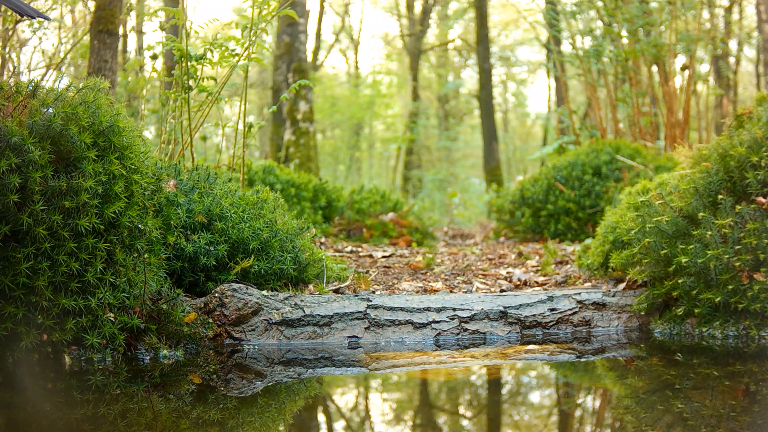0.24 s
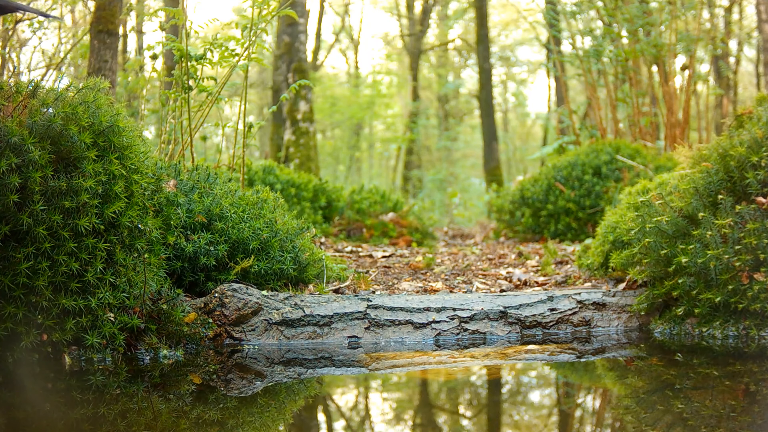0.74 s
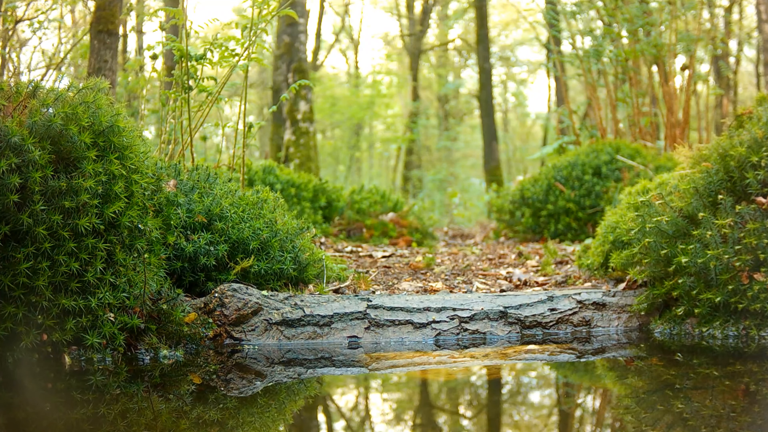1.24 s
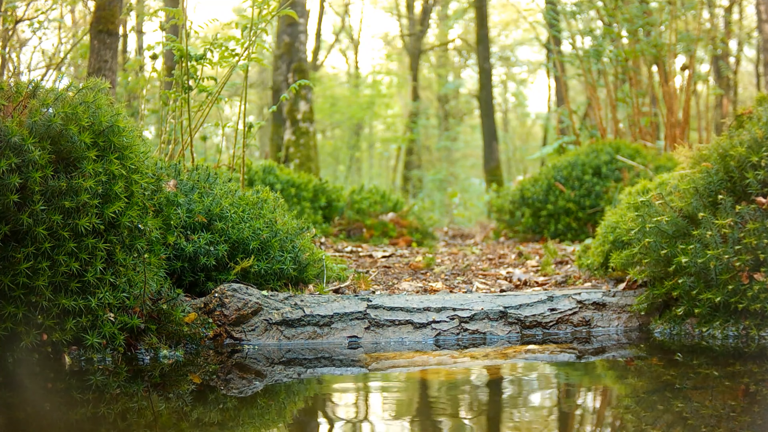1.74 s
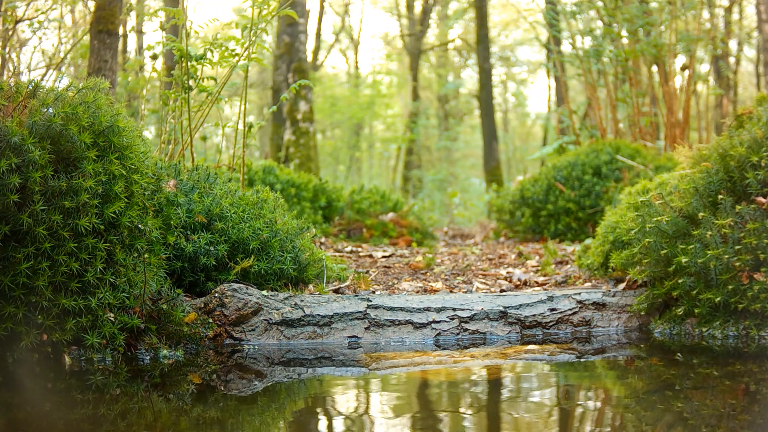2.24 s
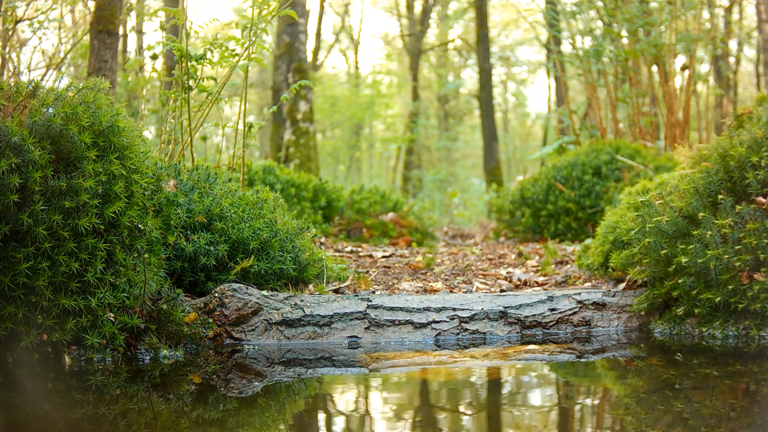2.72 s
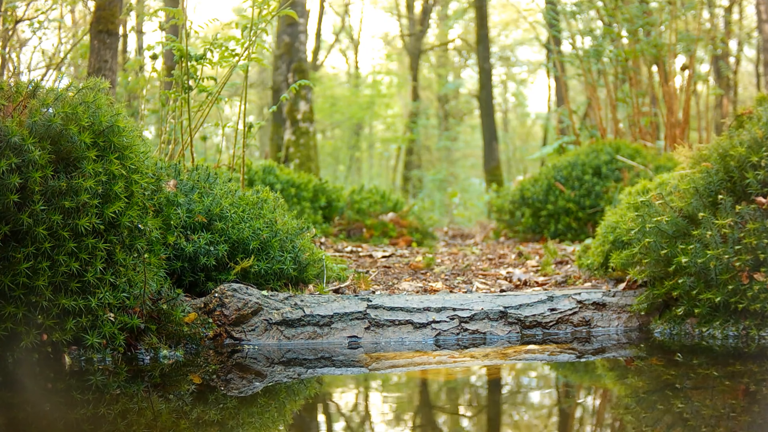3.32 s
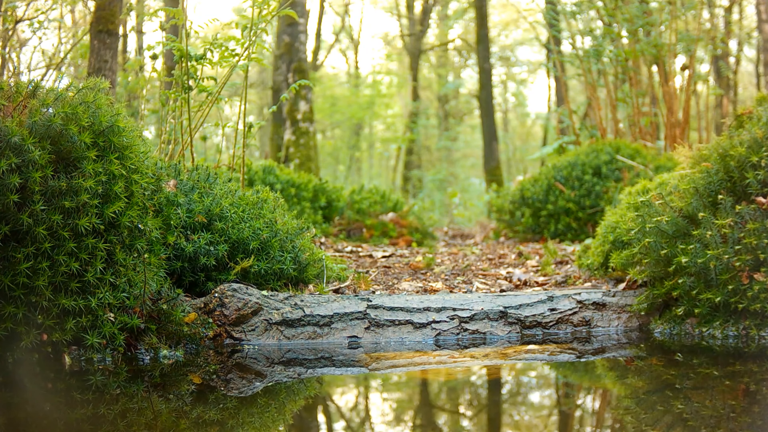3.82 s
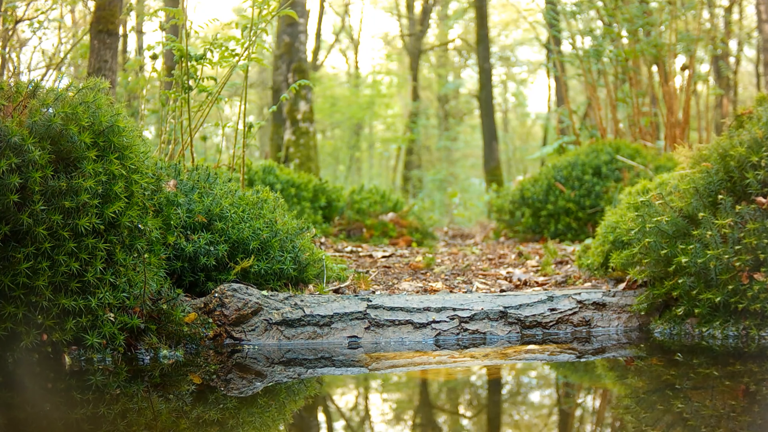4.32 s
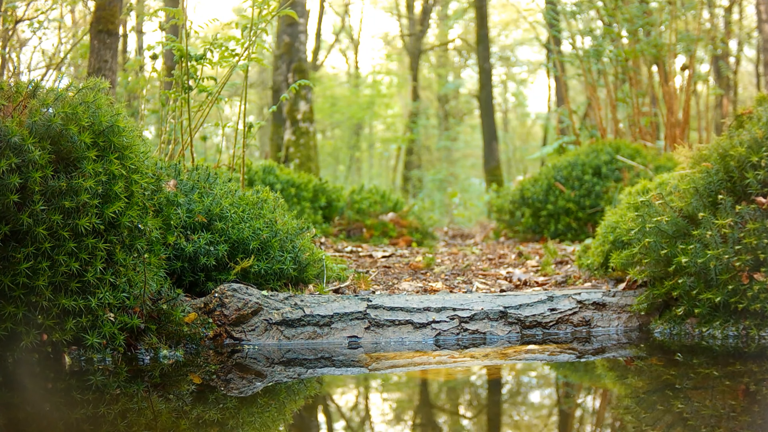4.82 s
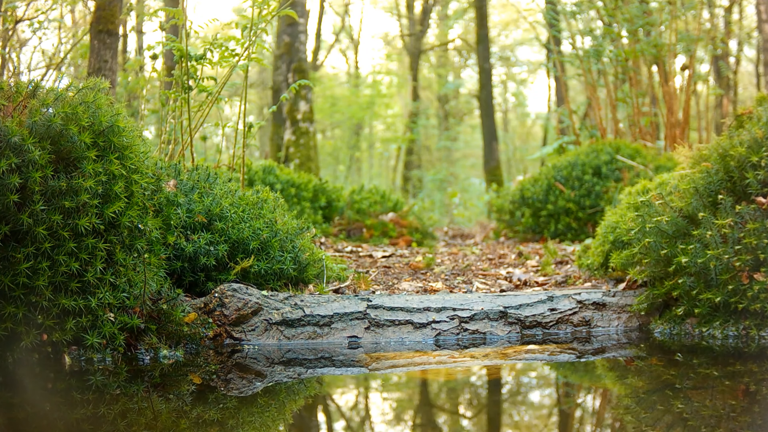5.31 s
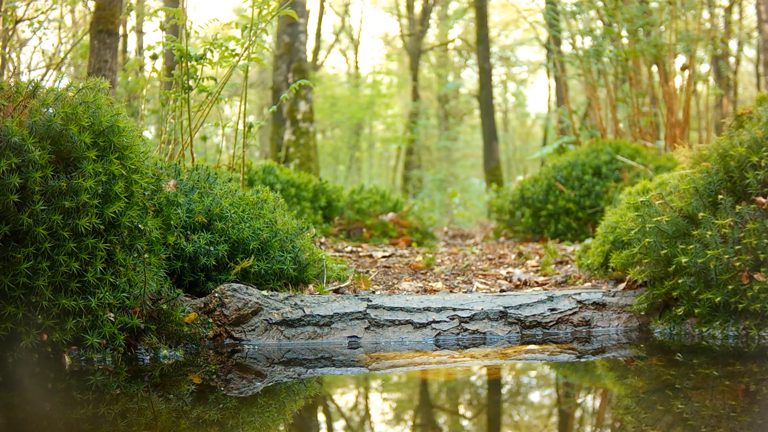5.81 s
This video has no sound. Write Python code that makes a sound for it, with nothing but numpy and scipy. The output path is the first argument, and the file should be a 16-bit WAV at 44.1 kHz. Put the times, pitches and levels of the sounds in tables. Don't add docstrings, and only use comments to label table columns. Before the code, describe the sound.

Faint, busy bird twitter in a leafy glade, a brief soft wing flutter, then one loud fluty blackbird phrase before the twitter resumes.

```python
import sys
import numpy as np
from scipy import signal
from scipy.fft import rfft, irfft, next_fast_len
from scipy.io import wavfile
from scipy.ndimage import uniform_filter1d

SR = 44100
rng = np.random.default_rng(int(sys.argv[2]) if len(sys.argv) > 2 else 0)


def how_loud(loudness_db):
    steps = np.asarray(loudness_db, float) / 20
    return 10 ** steps


def store_pcm(level_fs):
    pcm = np.round(np.clip(level_fs, -1, 1) * 32767).astype(np.int16)
    wavfile.write(sys.argv[1], SR, np.atleast_2d(pcm).T)


N = 267143


def evened(x):
    return x / np.sqrt(np.mean(x ** 2) + 1e-20)


def read(points, hz):
    f, value = np.transpose(points)
    return np.interp(np.log(hz + 1), np.log(f + 1), value)


def add(mix, s, sound):
    part = mix[round(s * SR):][:len(sound)]
    part += sound[:len(part)]


def drift(span, channels):
    wander = uniform_filter1d(rng.standard_normal((channels, N)), span)
    return evened(uniform_filter1d(wander, span))


def sung(rows, kind):
    bend, top, swell_db, fade_db = kind
    u = np.arange(17) / 16
    loss_db = np.interp(u, [0, np.clip(top, .02, .98), 1], [swell_db, 0, fade_db])
    notes = []
    for s, long, from_hz, to_hz, db in rows:
        pitch = from_hz + (to_hz - from_hz) * u ** bend
        notes.append(np.transpose([s + u * long, pitch, db - loss_db]))
    return notes


def whistle(rows, shake, edge, octave_db=-52):
    s, hz, level_db = np.transpose(rows)
    t = np.arange(s[0], s[-1], 1 / SR)
    per_s, swing_hz, dip, top, gap = shake
    wave = np.cos(2 * np.pi * per_s * (t - top))
    pitch = uniform_filter1d(np.interp(t, s, hz), 200, mode="nearest") + swing_hz * wave
    phase = 2 * np.pi * np.cumsum(pitch) / SR
    shut = 1 - np.clip(dip, 0, 1) * np.cos(np.pi * (per_s * (t - top) - gap)) ** 6
    to_end = np.minimum(t - s[0], s[-1] - t)
    ends = np.sin(np.pi / 2 * np.clip(to_end / edge, 0, 1)) ** 2
    tone = np.sin(phase) + how_loud(octave_db) * np.sin(2 * phase)
    return s[0], np.sqrt(2) * how_loud(np.interp(t, s, level_db)) * shut * ends * tone


def wood(x, near_db, far_db, near_t60):
    # frequency in Hz, decay time t60 in s.
    decay = [(1500, 1), (3000, 1.47), (5000, 0.85), (8000, 0.09)]
    # delay in s, level in dB.
    echoes = [(.00403, -10), (.00961, -11)]
    glade_s, glade_edge_s = .185, .025
    stir_rad = 2.2
    age = np.arange(SR) / SR
    taps = np.zeros((2, SR))
    at = np.arange(300, SR - 20, 20) + rng.integers(0, 20, (2, (SR - 301) // 20))
    np.put_along_axis(taps, at, rng.choice([-1., 1.], at.shape), 1)

    near = (taps * how_loud(-60 * age / near_t60))[:, :SR // 2]
    near /= 1 + np.exp((age[:SR // 2] - glade_s) / glade_edge_s * 2)
    near *= how_loud(near_db) / np.linalg.norm(near[0])
    for delay, db in echoes:
        arrival = np.round(delay * SR * np.array([1, 1.09])).astype(int)
        near[[0, 1], arrival] += how_loud(db)

    hz, t, z = signal.stft(taps, SR, nperseg=256)
    z *= how_loud(-60 * t / read(decay, hz)[:, None])
    far = signal.istft(z, SR, nperseg=256)[1][:, :SR]
    far /= np.linalg.norm(far[0])

    near = signal.fftconvolve(x[None], near, axes=1)[:, :N]
    far = signal.fftconvolve(x[None], far, axes=1)[:, :N]
    stir = stir_rad * drift(1500, channels=1)[0]
    far = np.cos(stir) * far + np.sin(stir) * far[::-1] * [[1], [-1]]
    return near + how_loud(far_db) * far


def bird(notes, shakes, edge, pan_db, lead_ms, flutter_db, near_db, far_db, near_t60):
    voice, size = np.zeros(N), next_fast_len(N)
    steady = (0.88, 0.0022, 0.0032, 0.0018, .5)
    for rows, shake in zip(notes, shakes + [steady] * len(notes)):
        add(voice, *whistle(rows, shake, edge))
    side = np.array([[.5], [-.5]])
    hz = np.fft.rfftfreq(size, 1 / SR)
    lead = np.exp(2j * np.pi * hz * side * lead_ms / 1000)
    unsteady = voice * how_loud(flutter_db * drift(500, channels=1))
    straight = irfft(rfft(unsteady, size) * lead, size)[:, :N] * how_loud(pan_db * side)
    return straight + wood(voice, near_db, far_db, near_t60)


def air():
    # frequency in Hz, level in dB.
    spectrum = [(30, -76), (100, -77), (300, -83), (1000, -89), (2000, -89.5), (3300, -85), (5000, -93),
                (6500, -99.5), (10600, -100), (11100, -119), (16000, -121)]
    # frequency in Hz, left-right likeness 0-1.
    likeness = [(25, 0.21), (100, 0.079), (300, 0.062), (700, 0.13), (9000, 0.044), (12000, 0.23)]
    patchy_db = 1.2
    frames, hz = N // 512 + 5, np.fft.rfftfreq(2048, 1 / SR)
    a, b, c, d, patches = rng.standard_normal((frames, 1025, 5)).T
    patches = evened(uniform_filter1d(uniform_filter1d(patches, 20, 0), 8, 1))
    same = np.clip(read(likeness, hz), -1, 1)[:, None]
    left = a + 1j * b
    right = same * left + np.sqrt(1 - same ** 2) * (c + 1j * d)
    z = np.array([left, right]) * how_loud(read(spectrum, hz)[:, None] + patchy_db * patches)
    return signal.istft(z, nperseg=2048, noverlap=1536)[1][:, :N]


def drone():
    # frequency in Hz, width in Hz, level in dB.
    tones = [(56, 14, -72.5), (77.5, 10, -81)]
    # time in s, level in dB.
    swell = [(0.0, -66), (1.789, -82), (4.619, -65.5), (6.05, -74)]
    s, db = np.transpose(swell)
    size = next_fast_len(N)
    f, out = np.fft.rfftfreq(size, 1 / SR), np.zeros((2, N))
    for hz, width, level_db in tones:
        noise = rng.standard_normal(size) + .7 * rng.standard_normal((2, size))
        band = np.exp(-((f - hz) / width) ** 2 * 2)
        out += how_loud(level_db) * evened(irfft(rfft(noise) * band, size)[:, :N])
    course = how_loud(np.interp(np.arange(N) / SR, s, db - db.mean()))
    return out * course * how_loud([[1.5], [-1.5]])


def warbler():
    # start in s, length in s, from Hz, to Hz, level in dB.
    buzzes = [(0, 0.1, 3490, 3770, -56), (.88, 0.073, 2843, 2877, -57.5), (1.31, 0.064, 3860, 3290, -48),
              (1.73, 0.063, 4225, 3960, -48.5), (3.34, 0.052, 4657, 4733, -60.5),
              (4.02, 0.043, 3160, 3212, -48), (3.45, 0.078, 4150, 4015, -52.5),
              (3.635, 0.046, 4020, 3960, -53.5), (3.825, 0.05, 4080, 4000, -54),
              (4.025, 0.08, 5140, 4946, -58), (4.615, 0.071, 6630, 8000, -62),
              (4.635, 0.046, 8200, 9370, -67), (4.655, .02, 4300, 5200, -46), (2.34, .03, 4700, 6040, -62),
              (2.545, .03, 4375, 5620, -57), (4.64, 0.075, 5440, 6300, -61.5),
              (4.7, 0.091, 4250, 4830, -55.5), (4.648, 0.027, 3950, 4810, -38.5),
              (4.9, 0.0307, 4800, 6870, -50), (5.14, 0.096, 2144, 2303, -52), (5.3, 0.049, 3192, 3150, -44),
              (5.58, 0.042, 3317, 3590, -48), (5.62, 0.013, 3470, 5630, -51.5),
              (5.72, 0.046, 5320, 5660, -67), (3.23, .08, 5100, 5500, -73), (3.36, .07, 4250, 4150, -64),
              (3.31, .1, 3600, 3450, -62), (3.51, .07, 5400, 5600, -71), (3.58, .08, 5100, 5050, -73),
              (3.7, .06, 5400, 5700, -67), (3.71, .05, 3850, 3800, -61), (3.86, .1, 5200, 5500, -68),
              (3.96, .025, 4600, 4550, -62), (4.05, .05, 4750, 4700, -63), (4.16, .05, 4700, 4800, -64),
              (4.23, .07, 4100, 4000, -66), (4.68, .1, 3700, 3900, -52), (4.72, .07, 5000, 5200, -61),
              (4.84, .12, 2850, 2700, -52), (4.66, .1, 7500, 7600, -68)]
    sweeps = [(.02, 0.018, 4270, 5070, -47), (.18, 0.053, 4090, 5050, -49.5), (.725, 0.04, 4440, 5200, -55),
              (.905, 0.05, 4860, 5790, -66), (1.085, 0.037, 4780, 5830, -62),
              (1.21, 0.036, 5020, 5115, -56), (1.42, 0.028, 4660, 5170, -54),
              (4.17, 0.036, 4830, 5700, -57), (4.335, .03, 4600, 5680, -58.5)]
    hooks = [(.415, 0.055, 3415, 5190, -50.5), (.585, 0.061, 2936, 5000, -50.5),
             (1.02, 0.052, 2933, 3930, -54), (1.23, 0.06, 2935, 4120, -50), (2.69, 0.061, 2450, 3370, -54),
             (2.82, 0.058, 2440, 3370, -58), (2.96, 0.057, 2443, 3440, -58), (3.09, 0.078, 2520, 3140, -57)]
    falls = [(.06, 0.072, 4530, 3310, -54), (.23, 0.037, 4800, 3880, -49), (.34, 0.064, 3360, 2840, -57.5),
             (.555, 0.031, 3290, 2800, -59), (.745, 0.051, 3130, 2838, -54.5),
             (1.11, 0.042, 3715, 3236, -53), (1.655, .05, 3550, 3050, -50.5),
             (1.835, .065, 3650, 3150, -46.5), (1.915, 0.029, 5000, 3720, -53.5),
             (2.02, 0.06, 3690, 3083, -45.5), (2.1, 0.031, 4770, 3715, -52.5),
             (2.345, 0.025, 4500, 2654, -53), (2.57, 0.052, 3900, 2913, -52.5),
             (3.8, 0.036, 2788, 2557, -51.5), (4.365, 0.096, 5590, 4040, -56.5),
             (4.4, .08, 4900, 4200, -59), (4.93, 0.011, 5100, 4050, -47)]
    curls = [(0, 0.034, 2800, 2960, -62.5), (.17, 0.022, 2900, 2907, -59.5), (.865, 0.037, 4440, 4230, -61),
             (1.445, 0.063, 2950, 3183, -52), (1.495, 0.043, 3720, 3895, -49.5),
             (1.54, 0.043, 4050, 3890, -48), (4.11, .26, 2844, 2766, -51), (2.17, 0.045, 2756, 3060, -58),
             (2.21, 0.058, 3270, 3973, -48), (2.37, 0.069, 3224, 3773, -47),
             (3.475, .04, 2330, 2396, -46.5), (3.7, .025, 2550, 2550, -52.5),
             (3.93, 0.072, 3000, 3100, -51.5), (3.26, 0.053, 3120, 3297, -54),
             (3.742, .05, 2790, 2766, -55), (5.975, 0.036, 3010, 3670, -54.5), (3.45, .08, 4750, 4600, -69),
             (3.59, .05, 2300, 2300, -55), (3.6, .06, 3400, 3300, -66), (3.67, .04, 4550, 4550, -69),
             (3.255, .025, 1620, 1750, -49), (5.04, .05, 1980, 2050, -64), (5.02, .05, 3750, 3700, -62),
             (4.885, .04, 4050, 4000, -61), (5.74, .06, 2100, 2500, -65), (5.76, .08, 3300, 3400, -60),
             (.27, .06, 5050, 5000, -62), (.66, .05, 5150, 5150, -63), (1.04, .05, 4250, 4300, -60),
             (1.33, .04, 4250, 4450, -64), (1.55, .04, 4500, 4300, -65)]
    flicks = [
        (1.737, 0.0046, 4400, 5450, -51),
        (2.322, .016, 4410, 6500, -53),
        (2.53, 0.014, 3900, 6210, -47),
        (5.755, 0.014, 3165, 5200, -47),
    ]
    # glide bend, loudest place 0-1, swell in dB, fade in dB.
    rasp = (1.4, 0.17, 1.3, 3.3)
    sweep = (.9, 1.1, 8, 6.9)
    hook = (2.5, 0.34, 30, 1)
    fall = (.8, .8, 2, 1)
    curl = (.6, 0.24, 4.2, 3.5)
    flick = (1.3, .3, 4, 27)
    # shakes per s, swing in Hz, level dip 0-1, s of one top, dip place in turns.
    buzz = (106.5, 149, 0.37, -0.5, .5)
    notes = sung(buzzes, rasp) + sung(sweeps, sweep) + sung(hooks, hook)
    notes += sung(falls, fall) + sung(curls, curl) + sung(flicks, flick)
    return bird(notes, [buzz] * len(buzzes), edge=0.00078, pan_db=-.7, lead_ms=2.5, flutter_db=0.31,
                near_db=-3, far_db=-6.5, near_t60=0.33)


def tit():
    # start in s, length in s, level in dB.
    low = [(0.552, .15, -48.5), (0.954, 0.059, -47.5), (1.035, 0.056, -42.5), (1.319, 0.022, -49),
           (1.365, .065, -47.5), (1.458, 0.049, -52), (5.063, 0.065, -60.5), (5.126, 0.064, -52),
           (5.212, 0.059, -47.5), (5.494, 0.1336, -47.5), (5.611, 0.03, -54), (5.898, 0.054, -49),
           (5.954, 0.065, -49)]
    high = [(.76, 0.18, -70.5), (1.135, 0.05, -60), (1.226, .045, -61), (1.636, .08, -66),
            (4.585, 0.025, -62.5), (4.8, 0.15, -66), (5.271, .07, -61.5), (5.665, 0.095, -58.5),
            (5.781, 0.071, -72.5)]
    # glide bend, loudest place 0-1, swell in dB, fade in dB.
    steady = (1.1, 0.59, 5.5, 5.1)
    low_hz, high_hz, rise_hz = 3982, 4723, 30
    notes = [(s, long, low_hz, low_hz + rise_hz, db) for s, long, db in low]
    notes += [(s, long, high_hz, high_hz + rise_hz, db) for s, long, db in high]
    return bird(sung(notes, steady), [], edge=0.0034, pan_db=1.3, lead_ms=1.285, flutter_db=2.6,
                near_db=-3.0, far_db=-9, near_t60=0.11)


def wings():
    # time in s, level in dB.
    strokes = [(0.821, -65), (0.886, -64), (0.944, -64), (1.012, -69), (1.084, -70), (1.157, -70),
               (1.23, -72)]
    # frequency in Hz, level in dB.
    spectrum = [(250, -7), (600, 3), (1150, -1), (2500, -10), (9000, -36), (14000, -36)]
    t, out = np.arange(1500) / SR, np.zeros(N)
    colour = how_loud(read(spectrum, np.fft.rfftfreq(1500, 1 / SR)))
    swell = t / 0.0071 * np.exp(1 - t / 0.0066)
    for (s, db), noise in zip(strokes, rng.standard_normal((len(strokes), 1500))):
        puff = evened(irfft(rfft(noise) * colour))
        add(out, s - .006, how_loud(db) * puff * swell)
    return out


def ticks():
    # time in s, relative level in dB.
    snaps = [(.893, -5), (.944, -3), (.972, -8), (1.011, 0), (1.083, 0), (1.156, -1), (1.229, -1)]
    level_db, decay_s, low_edge_hz = -66, .0015, 10500
    t, out = np.arange(400) / SR, np.zeros(N)
    high = signal.butter(4, low_edge_hz, "high", fs=SR, output="sos")
    for (s, db), noise in zip(snaps, rng.standard_normal((len(snaps), 400))):
        add(out, s, how_loud(level_db + db) * signal.sosfilt(high, noise * np.exp(-t / decay_s)))
    return out


def blackbird():
    # time in s, pitch in Hz, level in dB.
    trills = [
        [(3.148, 1794, -37.5), (3.18, 2274, -33), (3.21, 2344, -30), (3.235, 2353, -21)],
        [(3.85, 2600, -46), (3.87, 2560, -29), (3.895, 2537, -29), (3.915, 2370, -25)],
        [(4.272, 2188, -25), (4.3, 2190, -18.5), (4.36, 2167, -14), (4.385, 2180, -11.5), (4.401, 2150, -16)],
        [(4.647, 2007, -34.5), (4.672, 2340, -34.5), (4.7, 3027, -24)],
        [(4.726, 2655, -16.5), (4.745, 2322, -40), (4.765, 2430, -32), (4.779, 2790, -23)],
    ]
    # shakes per s, swing in Hz, level dip 0-1, s of one top, dip place in turns.
    shakes = [
        (79, 300, .85, 3.196, .3),
        (158, 120, .9, 3.873, .5),
        (42.5, 62, 1, 4.338, .52),
        (64, 190, .6, 4.685, .4),
        (45, 330, .2, 4.749, .5),
    ]
    # time in s, pitch in Hz, level in dB.
    flutes = [
        [(3.1, 2080, -54), (3.112, 1900, -48.5), (3.13, 1770, -35.5), (3.149, 1750, -28.5)],
        [(3.277, 2040, -38), (3.287, 2100, -22), (3.3, 2134, -21.5), (3.333, 2085, -16.5), (3.36, 2030, -19),
         (3.385, 1988, -21)],
        [(3.56, 1870, -34), (3.585, 1770, -19.5), (3.61, 1703, -20), (3.66, 1664, -24.5)],
        [(3.912, 2250, -25.5), (3.925, 2130, -20), (3.938, 2040, -17), (3.952, 1900, -30)],
        [(3.99, 2080, -37), (4.04, 2290, -33), (4.07, 2450, -31.5), (4.079, 2474, -12.5), (4.092, 2465, -13),
         (4.104, 2453, -17)],
        [(4.183, 1674, -37), (4.2, 1780, -24), (4.217, 1750, -18.5), (4.237, 1640, -27.5)],
        [(4.397, 2130, -15), (4.407, 2160, -13.5), (4.42, 2223, -17), (4.435, 2270, -17), (4.445, 2272, -28)],
        [(4.6, 3127, -42.5), (4.613, 3300, -33), (4.628, 3550, -36), (4.636, 3700, -23), (4.65, 3750, -31),
         (4.672, 3650, -38)],
        [(4.69, 2900, -27), (4.7, 3010, -21), (4.71, 3070, -21), (4.727, 3006, -15.5)],
        [(4.772, 2950, -30), (4.782, 3160, -23), (4.793, 3232, -13), (4.812, 3228, -11), (4.835, 3200, -28)],
    ]
    # start in s, length in s, from Hz, to Hz, level in dB.
    swells = [(3.511, 0.043, 1742, 1790, -18.5), (3.69, .022, 1977, 1940, -19.5),
              (3.96, .052, 2504, 2690, -24), (4.025, .07, 2720, 2800, -29)]
    drops = [(3.231, 0.026, 2600, 2040, -22), (3.672, .012, 1830, 1730, -19.5),
             (3.955, .036, 1979, 2061, -21), (4.104, 0.019, 2550, 1927, -23)]
    twitters = [(5.195, 0.022, 2430, 3230, -46), (5.215, 0.056, 3580, 2856, -36.5),
                (5.278, 0.038, 2596, 2517, -44), (5.35, 0.054, 4010, 3250, -40),
                (5.408, .037, 2476, 2568, -42.5), (5.6, 0.032, 1640, 1590, -60.5),
                (5.63, 0.042, 2040, 2400, -57)]
    # glide bend, loudest place 0-1, swell in dB, fade in dB.
    swell = (1.3, .95, 13, 1)
    drop = (0.89, 0.037, 1, 9)
    twitter = (1.8, 0.42, 2.5, 4.5)
    notes = trills + flutes + sung(swells, swell) + sung(drops, drop) + sung(twitters, twitter)
    return bird(notes, shakes, edge=.005, pan_db=8.2, lead_ms=.42, flutter_db=.4,
                near_db=-13, far_db=-27, near_t60=.62)


def lisper():
    # start in s, length in s, from Hz, to Hz, level in dB.
    lisps = [(5.17, 0.1, 7400, 7710, -51.5), (5.22, 0.022, 7300, 6360, -62), (5.3, .11, 7840, 7710, -58),
             (5.48, 0.032, 6900, 6620, -62), (5.64, 0.044, 7560, 7470, -64),
             (5.29, 0.028, 5260, 5100, -58.5), (5.41, 0.036, 5130, 5150, -64)]
    # glide bend, loudest place 0-1, swell in dB, fade in dB.
    thin = (.6, 0.77, 6.6, 3)
    # shakes per s, swing in Hz, level dip 0-1 (held at 0), s of one top, dip place in turns.
    shake = (71.5, 160, -3.5, 1, .5)
    return bird(sung(lisps, thin), [shake] * len(lisps), edge=0.0043, pan_db=-3.0, lead_ms=-1.3,
                flutter_db=4.2, near_db=-2.3, far_db=-0.5, near_t60=0.55)


def scene():
    distant = how_loud(-0.5) * (how_loud(.8) * warbler() + tit() + lisper())
    return air() + drone() + distant + wings() + ticks() + blackbird()


def low_pass(x):
    return signal.sosfilt(signal.butter(12, 15750, fs=SR, output="sos"), x)


def record(dry):
    return low_pass(dry)


dry = scene()
out = record(dry)
store_pcm(out)
```